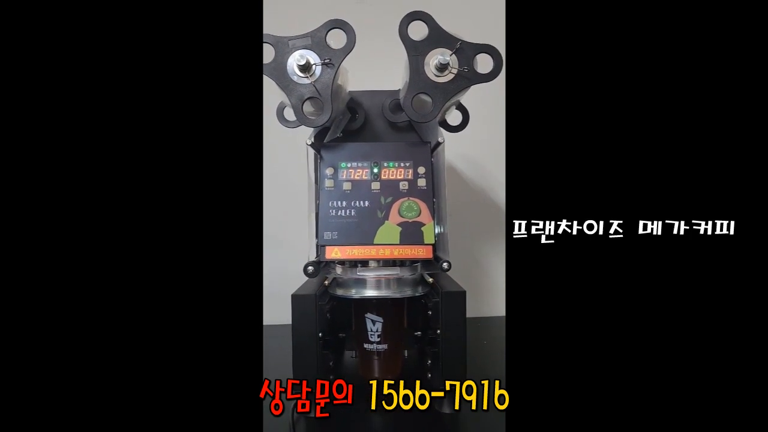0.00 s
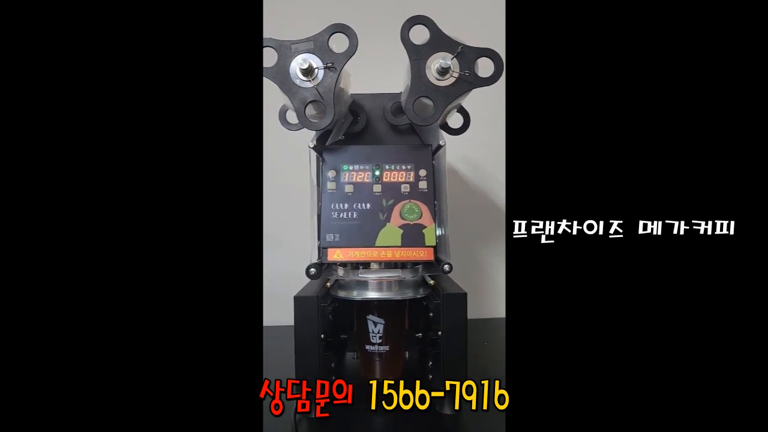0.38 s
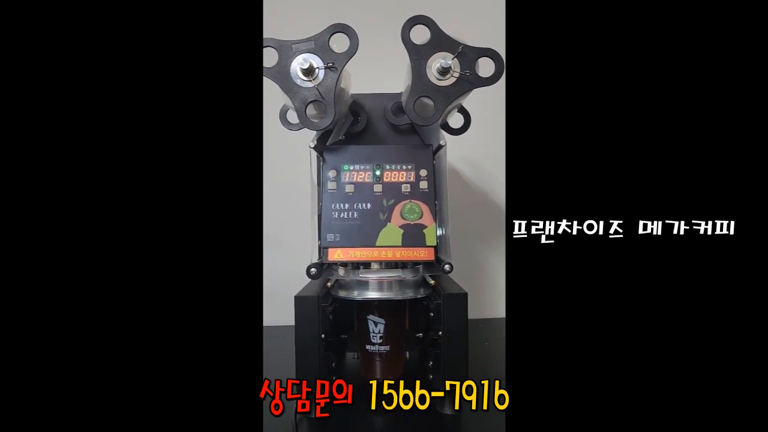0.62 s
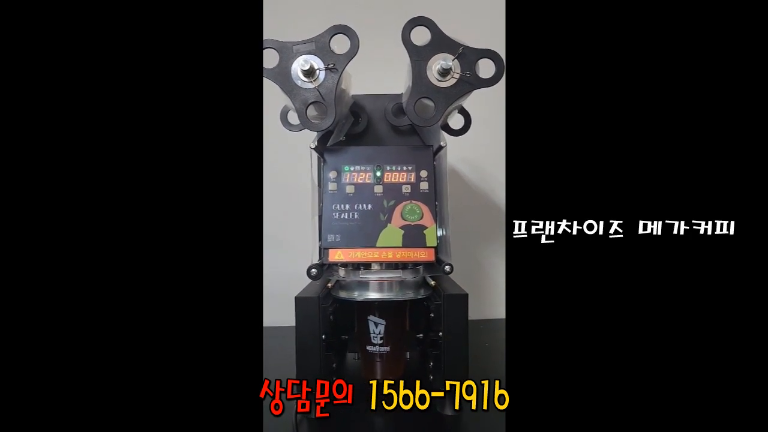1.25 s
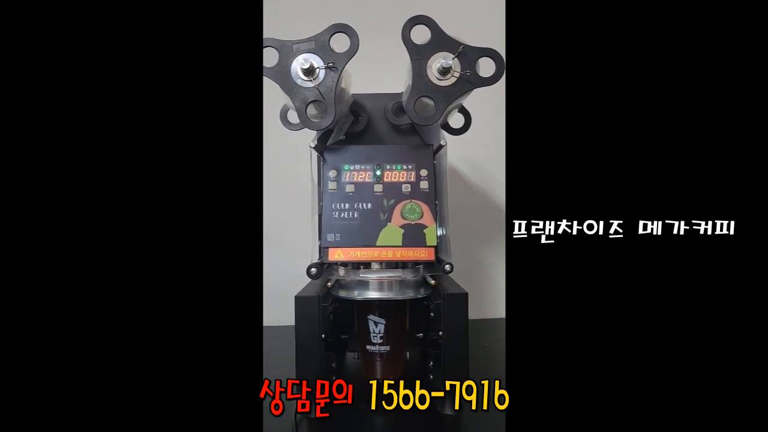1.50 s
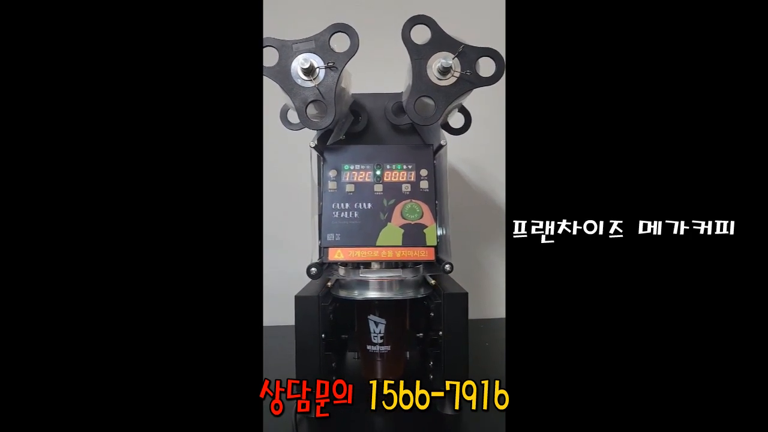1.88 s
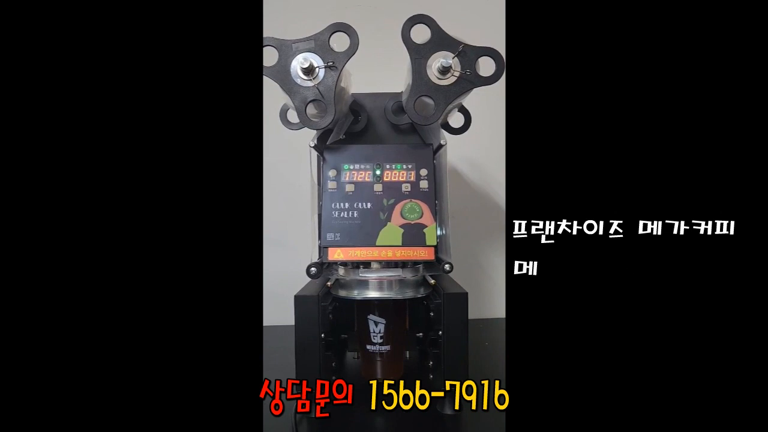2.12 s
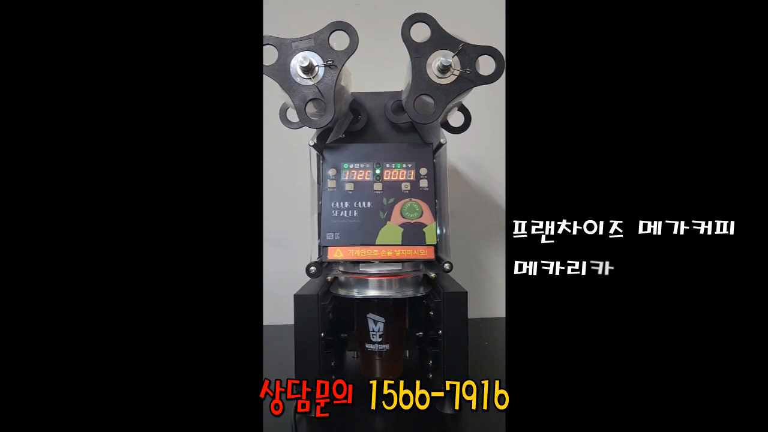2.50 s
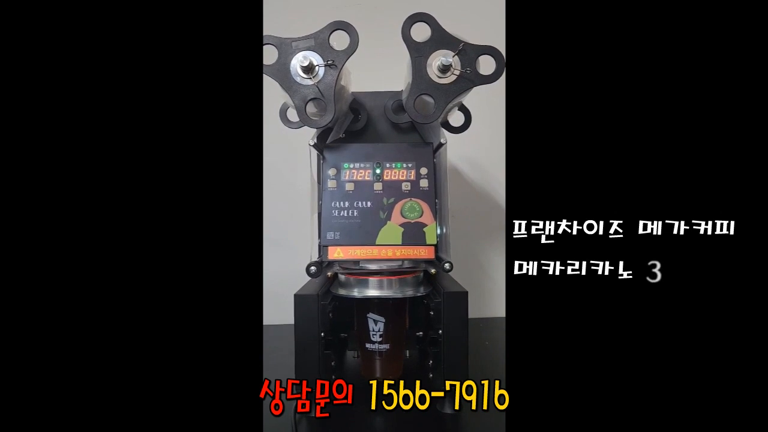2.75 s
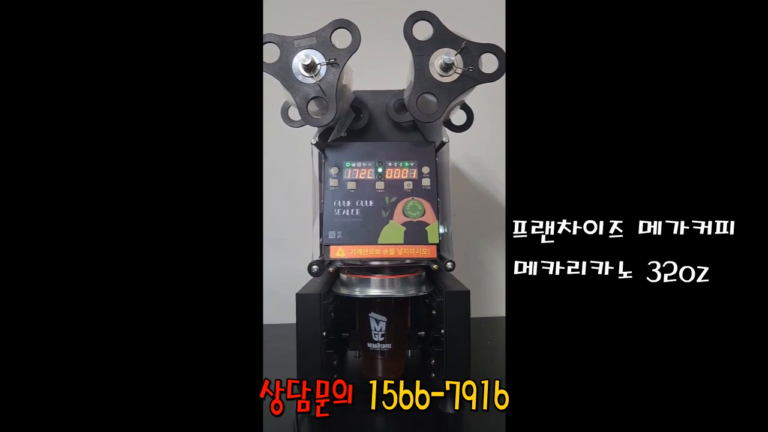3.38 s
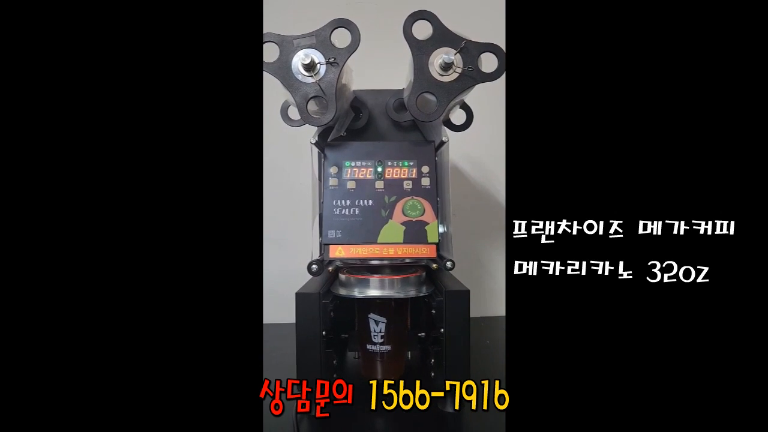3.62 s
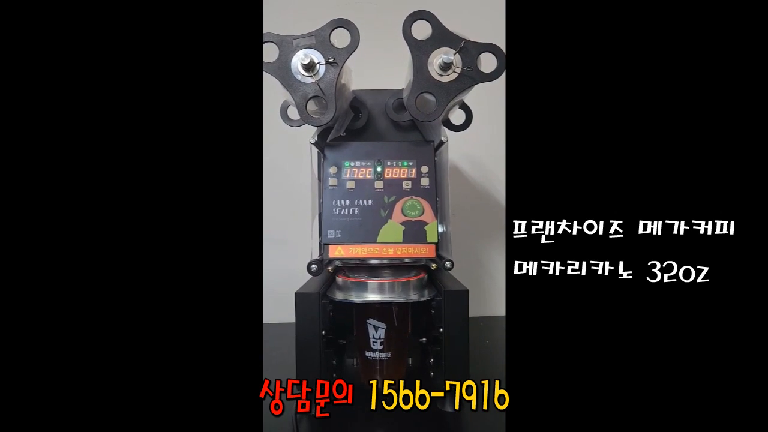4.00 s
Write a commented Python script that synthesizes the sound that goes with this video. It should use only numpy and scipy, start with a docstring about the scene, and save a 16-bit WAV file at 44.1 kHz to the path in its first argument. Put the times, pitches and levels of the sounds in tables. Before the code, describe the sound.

Motor hum and rattling gears of a tabletop cup sealer, stopping and clunking back into motion.

```python
"""A tabletop cup sealer works in a small hard room. First its humming motor turns rattling gears, winds
crackling film and stops. After a pause with faint ticks it starts again with a knock and a clunk.
It draws the cup in on a scraping tray, then strains to lift it to the heater. Switches click along
the way. At the end the gears wind down, leaving a deep electric hum and a thin whirr."""
import sys
import numpy as np
from scipy import signal
from scipy.fft import rfft, irfft
from scipy.io import wavfile
from scipy.ndimage import uniform_filter1d

SR = 44100
rng = np.random.default_rng(int(sys.argv[2]) if len(sys.argv) > 2 else 0)


def pcm_store(signal):
    """Save signal as 16-bit PCM."""
    levels = np.round(np.clip(np.atleast_2d(signal), -1, 1) * 32767)
    wavfile.write(sys.argv[1], SR, levels.astype(np.int16).T)


N = 176400
RIGHT_DELAY_S = 0.00013  # sound reaches the left microphone first

# How hard the gears work: time_s, level_db
GEAR_LOAD = [(0, 3), (.39, -4), (.46, -25.5), (.56, -42), (1.6, -63), (1.64, -1.5), (1.85, -4), (2.05, 2.5),
             (2.3, 2.5), (2.56, 1.5), (2.8, -0.5), (3.0, 2), (3.22, -1.5), (3.3, -47), (3.45, -29.5),
             (4, -21.5)]
# The table's deep shudder: pitch_hz, level_db
TABLE_RUMBLE = [(20, -23.5), (45, 2.5), (70, 5.5), (100, -7.5), (160, -1.5), (220, 1), (300, -7.5),
                (800, -58)]


def motor():
    """Magnetism makes the motor hum and its housing buzz; the hum shakes more as the gears work harder."""
    # Loudness of the hum: time_s, level_db
    hum_levels = [(0, -41), (.06, -40.5), (.25, -42), (.46, -47), (.53, -52.5), (.62, -79), (1.59, -105),
                  (1.66, -47), (1.73, -40.5), (1.85, -48.5), (2.05, -51.5), (2.39, -49.5), (2.44, -34),
                  (2.505, -49), (2.54, -37), (2.68, -42.5), (2.8, -45), (3.1, -44.5), (3.26, -40.5),
                  (3.43, -54.5), (3.54, -37.5), (3.66, -31.5), (4, -36)]
    # Loudness of the buzz: time_s, level_db
    buzz_levels = [(0, -49.5), (.33, -55), (.55, -71.5), (1.6, -100.5), (1.7, -59.5), (2.05, -52.5),
                   (2.43, -45), (2.62, -58.5), (2.84, -54.5), (3.04, -43.5), (3.24, -42), (3.33, -66),
                   (4, -73)]
    hum_hz, buzz_hz = 119.1, 240.9
    phase = turning(hum_hz, wobble=0.0025)
    shake = np.sqrt(fader(GEAR_LOAD))
    stereo_phase = phase + np.array([[np.pi], [-np.pi]]) * hum_hz * RIGHT_DELAY_S
    tone = np.sin(stereo_phase) + amp(-27.5) * np.sin(2 * stereo_phase)
    sway = np.array([[1], [-1]]) * amp(-19) * drift(24.87) * np.sin(phase)
    sway += 0.49 * drift(45) * np.cos(stereo_phase)
    hum = (tone + shake * sway) * fader(hum_levels) * amp(2.5 * shake * drift(45))
    buzz = np.sin(turning(buzz_hz, wobble=0.00945)) * fader(buzz_levels) * amp(2.0 * drift(29.9))
    return np.sqrt(2) * (hum + buzz)


def gears():
    """Gear teeth rattle in time with the motor's pulses, whine, and shake the frame and table."""
    # Tone of the rattle: pitch_hz, level_db
    rattle_colour = [(300, 1), (430, 2.5), (650, -3.5), (1020, -6), (1320, -5.5), (1600, -11),
                     (3550, -16.5), (4600, -22.5), (9500, -29.5), (13000, -23), (15500, -33.5)]
    # Thin running whines: pitch_hz, width_hz, level_db
    whines = [(1963, 77, -72.5), (3410, 140, -67.5)]
    # Gear notes while winding film: pitch_hz, level_db
    wind_tones = [(210, -54), (360.7, -62.5), (433, -67), (721, -70), (910, -57.5), (1206, -58.5)]
    # Gear notes while moving the cup: pitch_hz, level_db
    lift_tones = [(428, -56.5), (518, -61.5), (617, -63), (667, -70.5), (927, -66.5), (1211, -66),
                  (1254, -64), (3440, -73)]
    # Loudness of both sets of notes: time_s, level_db
    tone_levels = [(.37, -2), (.58, -35), (1.6, -71), (1.68, -5), (1.95, -4.5), (2.4, -2.5), (3.23, -2),
                   (3.36, -37), (3.6, -64.5)]
    # Straining notes at the top of the lift: pitch_hz, level_db
    strain_tones = [(360.7, -58.5), (441.4, -52.5), (516.8, -57.5), (732, -63.5), (856, -70.5),
                    (2099, -71.5)]
    # Loudness of the straining: time_s, level_db
    strain_levels = [(2.7, -57), (2.87, -7), (3.06, 0), (3.25, 1.5), (3.55, -62)]
    load = fader(GEAR_LOAD)
    teeth = grains(3000, scatter_db=2.5) * (1 + 0.36 * np.sin(turning(hz=119.1, wobble=0.01996)))
    teeth = unit(teeth) * amp(drift(39.6)) * load
    rattle = amp(-48.5) * unit(cut(colour(teeth, rattle_colour), 285, "high"))
    rattle += amp(-53.5) * unit(frame(teeth))
    whine = sum(amp(db) * unit(ring_twice(teeth, hz, 2 * width) * amp(3 * drift(15)))
                for hz, width, db in whines)
    tones = np.where(clock() < 1, gear_tones(wind_tones), gear_tones(lift_tones)) * fader(tone_levels)
    strain = gear_tones(strain_tones) * fader(strain_levels)
    rumble = amp(-52) * spread(*(unit(colour(n, TABLE_RUMBLE)) for n in rng.standard_normal((2, N))))
    average_load = np.sqrt(np.mean(load ** 2))
    return room(average_load * (rattle + whine)) + tones + strain + rumble * load


def gear_tones(tones):
    """Meeting teeth sing wavering notes that reach left and right out of step."""
    out = 0
    for hz, db in tones:
        phase = turning(hz, wobble=0.0045)
        middle = np.sin(phase) * amp(4.5 * drift(34.98))
        side = 1.37 * np.cos(phase) * drift(23.95)
        out = out + amp(db) * spread(middle, side)
    return np.sqrt(2) * out


def clunks():
    """Sharp cracks and knocks ring the frame: a film snap, starting clunks, the tray's jolts and thumps."""
    # Cracks and knocks: start_s, level_db, dull_above_hz, ring_db, decay_s
    knocks = [(.108, -39, 3000, -14, 0.0028), (1.608, -40.5, 770, 11, 0.022),
              (1.689, -38.5, 2270, -16, 0.014), (1.699, -34, 11400, 5, 0.0037),
              (1.704, -37, 2060, -9.5, 0.0036), (1.721, -44.5, 2380, 1, 0.037),
              (1.776, -44.5, 1690, -3, 0.0042), (2.182, -50, 2850, -13, 0.0047),
              (2.3252, -35.5, 2250, -3, .002), (2.3674, -39.5, 3970, -1.5, 0.0023),
              (2.397, -40, 4960, 1, 0.0015), (2.4233, -37.5, 3800, 1.5, 0.0028),
              (2.441, -38.5, 500, -2, 0.0084), (2.476, -41, 400, 6, 0.0023)]
    # Tone of the crack: pitch_hz, level_db
    crack_colour = [(100, 2.5), (300, -1), (650, 3.5), (1300, 5), (2400, -5), (3300, 1.5), (5000, -0.5),
                    (15000, -7.5)]
    out = 0
    for start_s, db, dull_above_hz, ring_db, decay_s in knocks:
        push = cut(chatter(start_s, decay_s), dull_above_hz, "low")
        crack = unit(colour(push, crack_colour))
        out = out + burst(crack + amp(ring_db) * unit(frame(push)), db)
    return out


def frame(x):
    """The shaken frame rings at its own pitches."""
    # The frame's notes: pitch_hz, width_hz, level_db
    notes = [(220, 52, -3), (426.6, 49.4, 11.5), (654, 81, 2), (769, 33, 7), (865, 15, -14.5),
             (1174, 57, 4.5), (1910, 203, -6)]
    return sum((-1) ** k * amp(db) * ring(x, hz, width) for k, (hz, width, db) in enumerate(notes))


def tray():
    """The cup tray sticks and slips, harder near the end of its travel, and creaks on the way."""
    # Loudness of the scrape: time_s, level_db
    scrape_levels = [(2.0, -85), (2.15, -55), (2.25, -39.5), (2.33, -50), (2.39, -40), (2.435, -35),
                     (2.48, -61), (2.52, -56), (2.6, -100)]
    # Tone of the scrape: pitch_hz, level_db
    scrape_colour = [(100, 1.5), (160, 16.5), (300, 0.5), (480, 12.5), (680, 3.5), (800, 2), (3000, -6),
                     (6000, -17.5), (10000, -23), (15000, -29)]
    creak_at_s, creak_swell_s = 2.205, .04
    slips = colour(grains(900, scatter_db=4.5), scrape_colour)
    scrape = unit(cut(slips, 100, "high")) * fader(scrape_levels)
    creak = unit(ring_twice(grains(235, scatter_db=4.8), hz=2230, width_hz=600))
    return scrape + amp(-46) * creak * np.exp(-((clock() - creak_at_s) / creak_swell_s) ** 2)


def film():
    """Plastic film crackles off its roll."""
    # Loudness of the crackle: time_s, level_db
    crackle_levels = [(0, -26.5), (.02, -48), (.055, -37.5), (.098, -33.5), (.116, -46), (.128, -64.5),
                      (.17, -100)]
    # Tone of the crackle: pitch_hz, level_db
    crackle_colour = [(400, -4), (750, -5.5), (1000, -9), (1400, -12.5), (2000, -2), (6000, -7.5),
                      (10000, -12), (15000, -9)]
    crackle = colour(grains(3500, scatter_db=3.9), crackle_colour)
    return unit(cut(crackle, 340, "high")) * fader(crackle_levels)


def clicks():
    """Switches and catches snap, each with its own ping; the resting machine ticks faintly."""
    # Switch snaps: start_s, level_db, pitch_hz, ping_db, decay_s, bright_db
    snaps = [(.203, -42, 6700, -12, 0.0044, -2), (2.005, -41, 6830, -11, 0.0041, 5),
             (2.134, -46.5, 6470, -18, 0.025, 5.5), (2.29, -54, 13200, -7, 0.0055, 15),
             (2.417, -52.5, 12200, 3, .008, 4), (2.678, -51, 13500, -12, .0031, 5.5),
             (3.016, -40, 2880, -6, 0.002, 6), (3.06, -50, 3460, -23, .022, 3.5),
             (3.658, -53.5, 6130, -10, .008, 1.5), (3.672, -42, 6030, -17, 0.0051, 0)]
    # Tone of a snap: pitch_hz, level_db
    snap_colour = [(400, 1.5), (1500, -1.5), (2800, -1.5), (3700, 7), (6200, -1), (9300, -7.5),
                   (12000, -1.5), (16000, 0)]
    # Ticks in the pause: start_s, level_db, pitch_hz
    ticks = [(.496, -73, 2830), (.665, -76, 2970), (.925, -70, 4330), (1.112, -72, 1700),
             (1.38, -70.5, 3380), (1.42, -70.5, 1900)]
    out = 0
    for start_s, db, hz, ping_db, decay_s, bright_db in snaps:
        snap = colour(chatter(start_s, decay_s, rise_s=0.0043), snap_colour)
        snap = colour(snap, [(5600, 0), (12800, bright_db)])
        ping = ring_twice(snap, hz, width_hz=1300)
        out = out + burst(unit(snap) + amp(ping_db) * unit(ping), db)
    for start_s, db, hz in ticks:
        out = out + burst(ring(chatter(start_s, decay_s=0.012), hz, width_hz=1800), db)
    return out


def whirr():
    """The machine whirrs thinly and the table shudders while the heater presses."""
    # Bands of whirring noise: pitch_hz, width_hz, level_db
    bands = [(444, 148, -62.5), (600.6, 16.5, -64.5), (1533, 79, -69.5), (1860, 300, -69.5)]
    start_s, rise_s = 3.25, 0.018
    fade_in = np.clip((clock() - start_s) / rise_s, 0, 1)
    song = sum(amp(db) * unit(ring_twice(rng.standard_normal(N), hz, 2 * width))
               for hz, width, db in bands)
    shudder = amp(-55.5) * unit(colour(rng.standard_normal(N), TABLE_RUMBLE))
    return fade_in * (song + shudder)


def room(x):
    """Hard walls add a short echo that dulls as it dies."""
    low_fade_s, high_fade_s = 0.3, 0.22  # time to fall by 60 dB
    t, echo_gain = clock(), amp(1)
    a, b = (cut(n, 4120, "low") * amp(-60 * t / low_fade_s)
            - cut(n, 3940, "high") * amp(-60 * t / high_fade_s) for n in rng.standard_normal((2, N)))
    tail = spread(unit(a), unit(b)) * (t > .002) * echo_gain / np.sqrt(N)
    echo = signal.fftconvolve(x[None], tail, axes=1)[:, :N]
    right = np.r_[np.zeros(int(RIGHT_DELAY_S * SR)), x][:N]
    return (np.array([x, right]) + echo) / np.sqrt(1 + echo_gain ** 2)


def air():
    """The room's quiet background noise gently rises and falls."""
    # Tone of the background: pitch_hz, level_db
    air_colour = [(20, -12), (59, 3), (96, -7), (220, -8.5), (330, -20.5), (720, -19), (1050, -39.5),
                  (3400, -43.5), (4800, -33.5), (5900, -44.5), (7000, -37), (8200, -55), (15000, -43)]
    a, b = (unit(colour(n, air_colour)) for n in rng.standard_normal((2, N)))
    return (spread(a, b) + 0.12 * np.array([b, -b])) * amp(-60 + 2.64 * drift(4.64))


def amp(db):
    """Turn decibels into a multiplier."""
    return 10 ** (np.asarray(db) / 20)


def unit(x):
    """Scale to an average (rms) size of 1."""
    return x / np.sqrt(np.mean(x ** 2) + 1e-30)


def clock():
    """Time of each sample, in seconds."""
    return np.arange(N) / SR


def fader(points):
    """A volume curve through (time_s, level_db) points."""
    return amp(np.interp(clock(), *np.array(points).T))


def drift(rate_hz):
    """A smooth random wander, about 1 in size."""
    hold = int(SR / rate_hz)
    steps = np.repeat(rng.standard_normal(N // hold + 1), hold)
    return unit(uniform_filter1d(uniform_filter1d(steps, hold), hold)[:N])


def turning(hz, wobble):
    """Angle of a spinning part whose speed wavers."""
    return 2 * np.pi * np.cumsum(hz * (1 + wobble * drift(12))) / SR


def colour(x, points):
    """Shape the tone along (pitch_hz, level_db) points."""
    hz, db = np.array(points).T
    grid_hz = np.arange(N + 1) * SR / (2 * N)
    gains = amp(np.interp(np.log(grid_hz + 1e-3), np.log(hz), db))
    cepstrum = irfft(np.log(gains))
    cepstrum[1:N] *= 2  # folded so that nothing rings before it is struck
    cepstrum[N + 1:] = 0
    return irfft(rfft(x, 2 * N) * np.exp(rfft(cepstrum)))[..., :N]


def cut(x, hz, keep, order=2):
    """Keep the "low" or "high" side of a pitch."""
    return signal.sosfilt(signal.butter(order, hz, keep, fs=SR, output="sos"), x + 1e-18)


def ring(x, hz, width_hz):
    """Ring at one pitch; a narrower width rings longer."""
    return signal.lfilter(*signal.iirpeak(hz, hz / width_hz, fs=SR), x + 1e-18)


def ring_twice(x, hz, width_hz):
    """Two rings in a row give a purer pitch."""
    return ring(ring(x, hz, width_hz), hz, width_hz)


def grains(per_second, scatter_db):
    """Tiny random taps of uneven size."""
    taps = (rng.random(N) < per_second / SR) * rng.choice([-1, 1], N)
    return unit(taps * amp(scatter_db * np.minimum(rng.exponential(size=N), 3)))


def chatter(start_s, decay_s, rise_s=0.0016):
    """Two parts meet and chatter quickly to rest."""
    age = np.maximum(clock() - start_s, 0)
    return grains(6000, scatter_db=3.7) * (1 - np.exp(-age / rise_s)) ** 2 * np.exp(-age / decay_s)


def burst(x, db):
    """Give a short sound the energy of 20 ms at this level."""
    return unit(x) * amp(db) * np.sqrt(.02 * SR / N)


def spread(middle, side):
    """Make a left and right pair that shares its bass."""
    side = cut(side, 636, "high", order=1)
    return np.array([middle + side, middle - side])


def scene():
    """The machine in its room."""
    return motor() + gears() + room(film() + tray() + clunks() + clicks() + whirr()) + air()


def record(dry):
    """The two microphones differ a little in tone, and the highest treble is cut."""
    # How much louder the left side is: pitch_hz, left_minus_right_db
    balance = [(60, 1), (120, -1), (200, -5), (380, 3), (1000, 0.5), (2400, -2.5), (4400, 2.5), (8000, 5.5),
               (15000, -1)]
    top_hz = 15700
    pair = np.array([colour(x, [(hz, sign * db / 2) for hz, db in balance])
                     for x, sign in zip(dry, (1, -1))])
    return signal.sosfilt(signal.ellip(10, .2, 80, top_hz, fs=SR, output="sos"), pair)


dry = scene()
out = record(dry)
pcm_store(out)
```